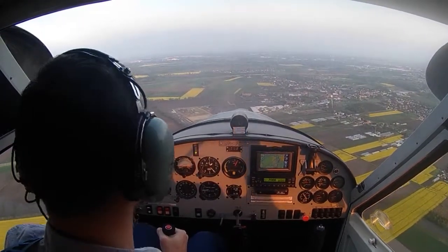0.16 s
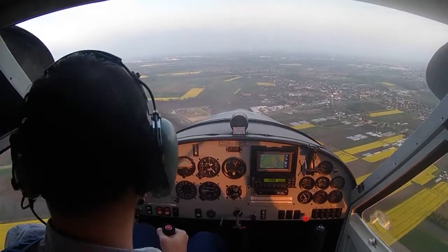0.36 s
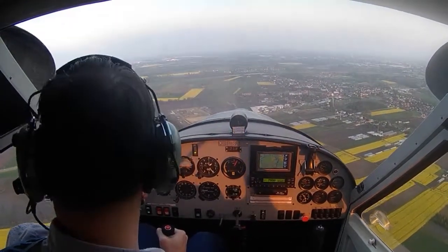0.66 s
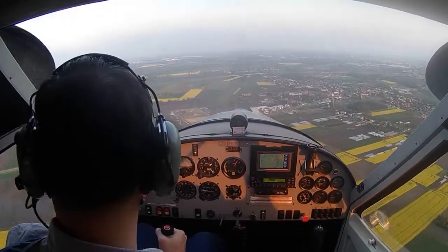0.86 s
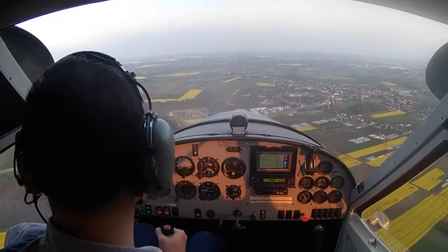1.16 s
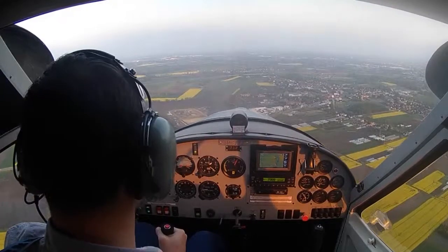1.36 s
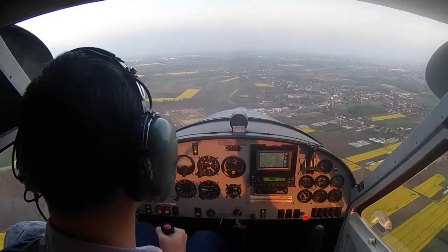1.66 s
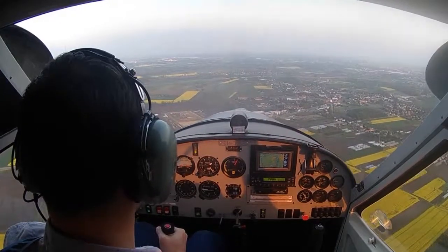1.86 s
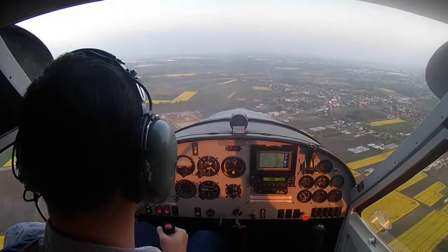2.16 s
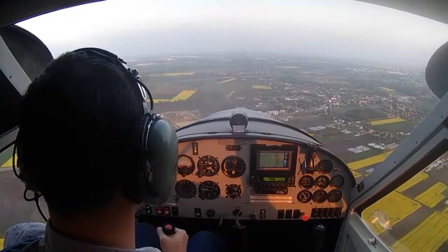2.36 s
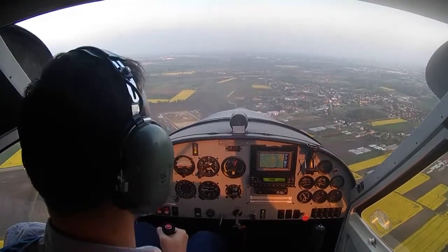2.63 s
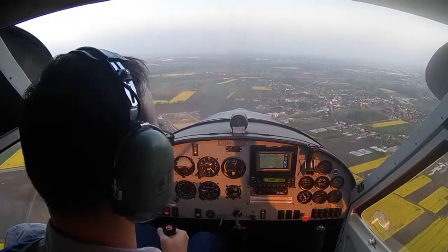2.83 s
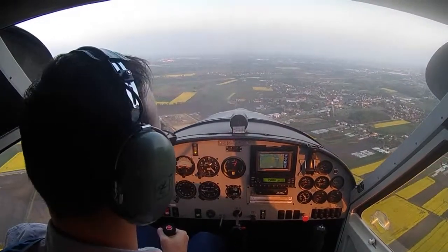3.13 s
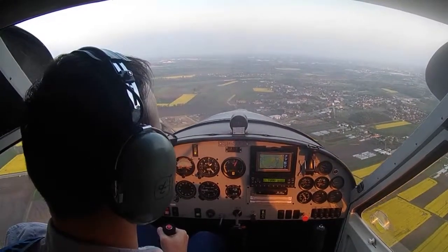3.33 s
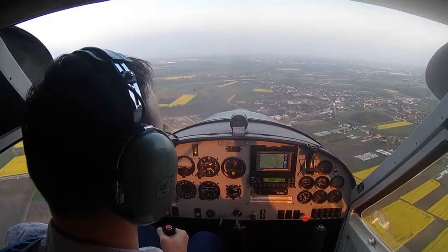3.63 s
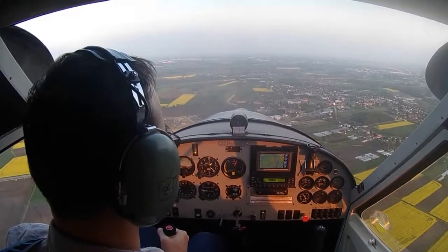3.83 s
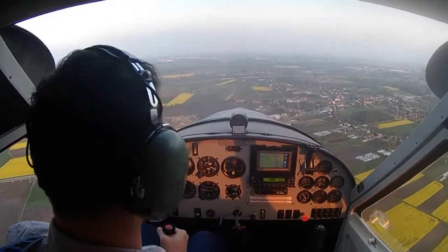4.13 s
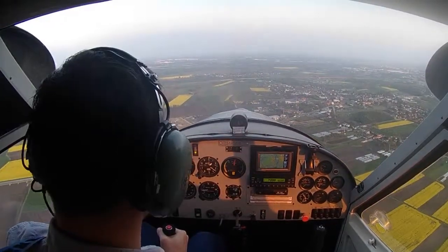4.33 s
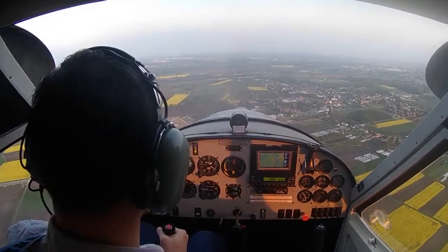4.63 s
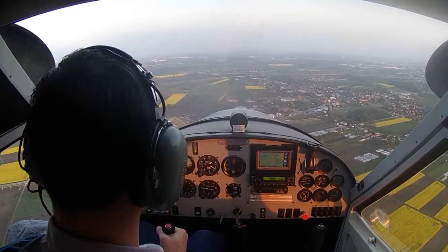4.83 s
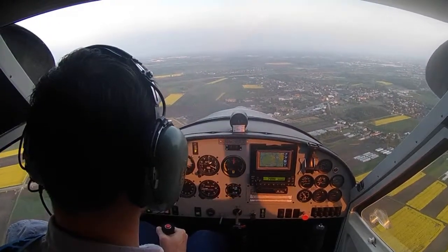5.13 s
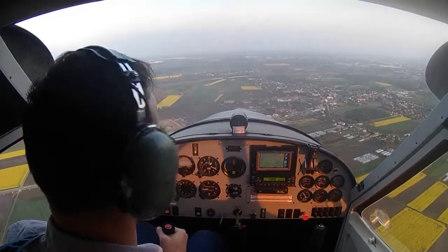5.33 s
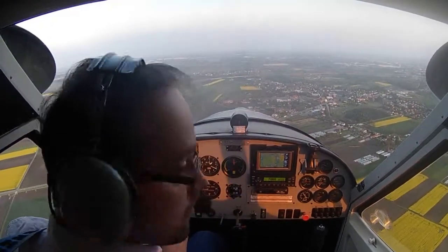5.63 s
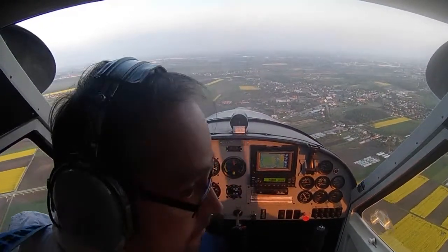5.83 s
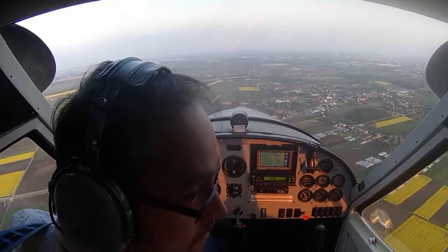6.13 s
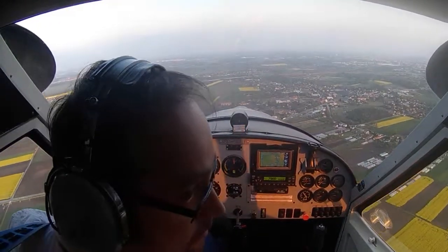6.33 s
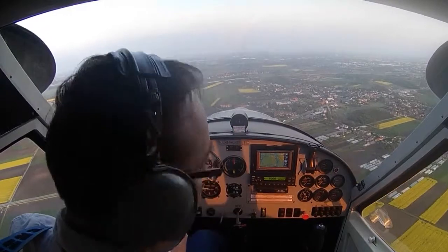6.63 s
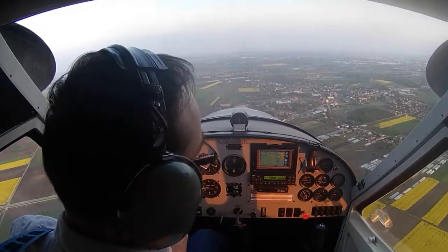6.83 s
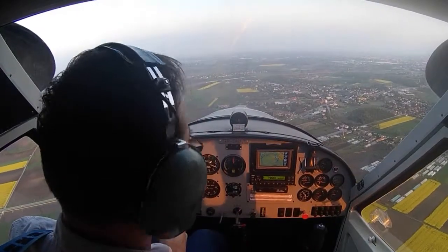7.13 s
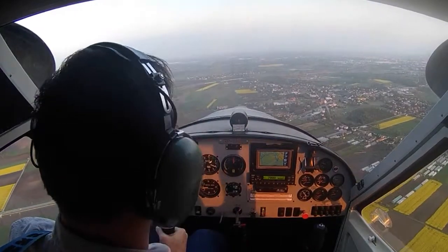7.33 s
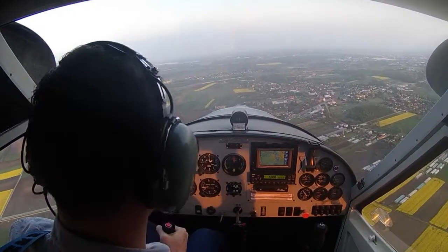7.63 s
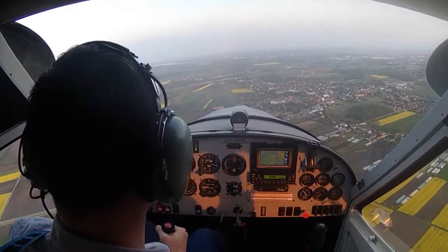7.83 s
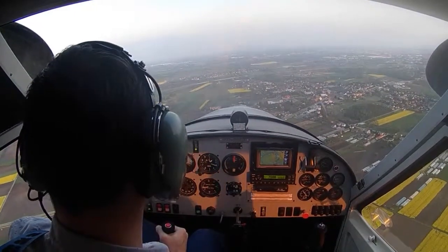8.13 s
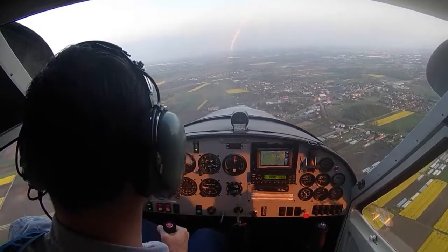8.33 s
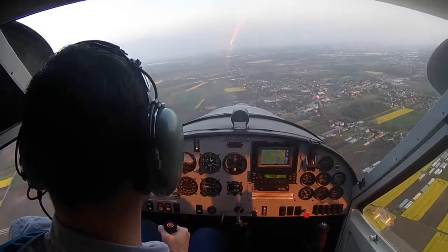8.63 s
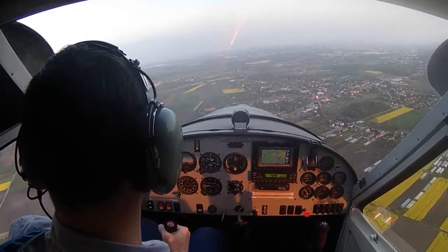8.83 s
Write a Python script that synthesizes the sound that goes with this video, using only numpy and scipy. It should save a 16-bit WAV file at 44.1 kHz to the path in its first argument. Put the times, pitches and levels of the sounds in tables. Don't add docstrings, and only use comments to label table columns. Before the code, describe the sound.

Heard inside a light aircraft cockpit in flight: a heavy, low propeller and piston engine drone with thudding buffets and constant air rush. Near four seconds the throttle is pulled back; the pitch slides down and the tones thin, leaving cabin boom and wind until the end. A small enclosed microphone muffles the treble, overloads on peaks and adds a very faint high whine.

```python
import sys
import numpy as np
from scipy import signal
from scipy.fft import rfft, irfft, next_fast_len
from scipy.io import wavfile
from scipy.ndimage import uniform_filter1d

SR = 44100
rng = np.random.default_rng(int(sys.argv[2]) if len(sys.argv) > 2 else 0)


def natural_amplitude(level_db):
    exponent = np.asarray(level_db, float) / 20
    return 10 ** exponent


def transcribe(u):
    v = np.clip(np.atleast_2d(u).T, -1, 1)
    q = np.round(v * 32767).astype(np.int16)
    wavfile.write(sys.argv[1], SR, q)


N = 396018


def rms_one(x):
    return x / np.sqrt(np.mean(x ** 2) + 1e-20)


def in_time(rows):
    seconds, *columns = np.transpose(rows)
    return [np.interp(np.arange(N) / SR, seconds, column) for column in columns]


def drift(rate):
    pole = np.exp(-80 * np.pi * rate / SR)
    noise = rng.standard_normal(N // 40 + 2002)
    slow = signal.lfilter([1], [1, -2 * pole, pole * pole], noise)[2000:]
    return np.interp(np.arange(N) / 40, np.arange(len(slow)), rms_one(slow))


def shaped(gain_at):
    size = next_fast_len(N)
    hz = np.arange(size // 2 + 1) * SR / size + 1e-3
    spectrum = rfft(rng.standard_normal(size)) * gain_at(hz)
    return rms_one(irfft(spectrum, size)[:N])


def resonant(modes, steep):
    def gain_at(hz):
        power = 0
        for centre, width, db in modes:
            detuning = (hz ** 2 - centre ** 2) / (hz * width)
            power = power + natural_amplitude(2 * db) / (1 + detuning ** 2) ** steep
        return np.sqrt(power)
    return shaped(gain_at)


def evened(x, size):
    return x / np.sqrt(uniform_filter1d(x ** 2, size=size) + 0.017)


def running(x, order, hz, kind="low"):
    run_in = 4096
    sos = signal.butter(order, hz, kind, fs=SR, output="sos")
    led_in = np.concatenate([x[..., run_in:0:-1], x], axis=-1)
    return signal.sosfilt(sos, led_in)[..., run_in:]


def tone(turns, level_db, wobble_db):
    return np.sqrt(2) * natural_amplitude(level_db + wobble_db * drift(1.0)) * np.sin(2 * np.pi * turns)


def whine():
    # time in seconds, shift in Hz.
    sag = [
        (0, 3),
        (7.05, -1),
        (7.07, -30),
        (7.97, -26.5),
        (7.99, -1),
        (8.98, 0),
    ]
    whine_hz, wander_hz, chop_hz, side_tone_hz = 15703.7, 2.5, 97.22, 11880
    t = np.arange(N) / SR
    turns = np.cumsum(whine_hz + in_time(sag)[0] + wander_hz * drift(1.5)) / SR
    chop = sum(2 * natural_amplitude(-11.5) / k ** 1.3 * np.cos(2 * np.pi * k * chop_hz * t) for k in range(1, 11))
    carrier = natural_amplitude(-53.5) * (1 + chop) * np.sin(2 * np.pi * turns)
    side_tone = natural_amplitude(-82) * np.sin(2 * np.pi * side_tone_hz * t)
    return np.sqrt(2) * (carrier + side_tone)


def top_air(swell_db):
    # frequency in Hz, level in dB per Hz.
    air_curve = [(5000, -12.5), (6300, -8.5), (7200, -7), (7700, -9.5), (8100, -3), (8600, -4), (9400, 0),
                 (10100, 1.5), (11200, -6.5), (11700, -2.5), (13300, -4), (13900, -7), (15000, -6),
                 (16000, -4.5)]
    hz, level_db = np.transpose(air_curve)
    air = shaped(lambda f: natural_amplitude(np.interp(np.log(f), np.log(hz), level_db, left=-60)))
    return natural_amplitude(-54.5 + 0.55 * swell_db) * air


def housing_hiss(swell_db):
    # centre in Hz, width in Hz, level in dB.
    housing_modes = [(2140, 80, -12.5), (2286, 76, -5), (2372, 225, -2.5), (2470, 92, 1.5), (2613, 29, 0),
                     (2670, 74, -5.5), (2997, 420, -5.5), (3290, 330, -10), (3556, 110, -7.5),
                     (3880, 200, -14), (4454, 66, -13), (4766, 220, -13), (5260, 230, -15.5),
                     (5790, 100, -21), (6350, 150, -39), (6870, 220, -24)]
    return natural_amplitude(-28.0 + 1.03 * swell_db + 0.18 * drift(6.3)) * resonant(housing_modes, steep=1.24)


def canopy_rush(rush_db):
    # centre in Hz, width in Hz, level in dB.
    canopy_modes = [(495, 98, -8.5), (543, 14, -9), (598, 20, -9), (637.4, 12.6, -5), (767, 112, -6),
                    (847, 35, -6.5), (947.4, 48, -1), (1053, 100, -5.5), (1144, 56, -2.5),
                    (1196.5, 18, 0.5), (1235, 11, 0.5), (1271, 63, -3.5), (1335, 22, -4), (1396, 55, -5.5),
                    (1507, 49, 0), (1680, 90, -11), (1797, 74, -14.5), (1906, 62, -12.5), (2040, 40, -19.5)]
    return natural_amplitude(rush_db + 0.69 + 0.71 * drift(3.3)) * resonant(canopy_modes, steep=1.274)


def cabin_boom(power, swell_db):
    # centre in Hz, width in Hz, level in dB.
    cabin_modes = [(26, 5, -9), (45.4, 6.8, -6), (55, 7.9, -3), (69.5, 8.4, -2.5), (82.9, 11.7, 2.5),
                   (99, 15, -29), (122.4, 18, -6), (141.6, 14.3, -4.5), (183, 18, -10.5), (194.5, 15, -7),
                   (215.5, 9.1, -1), (234.8, 13.2, -3), (268.4, 25, -10.5), (295.5, 12.6, -12.5),
                   (326.6, 16.5, -11.5), (348, 20, -14), (393.2, 19.4, -12), (408, 17.5, -15)]
    return natural_amplitude(-19 + 2.73 * power + 0.61 * swell_db) * resonant(cabin_modes, steep=1.42)


def airframe_heave():
    # centre in Hz, width in Hz, level in dB.
    heave_modes = [(33.2, 0.87, 6), (38.1, 1.4, -19)]
    # time in seconds, level in dB.
    turbulence = [(0.0, -18), (0.05, -20), (1.45, -22), (1.5, -29), (1.72, -21), (2.8, -16.5), (3.02, -25),
                  (3.07, -17), (3.83, -19.5), (4.03, -12.5), (4.87, -28), (5.28, -18), (6.05, -22),
                  (6.15, -35), (6.65, -13.5), (7.2, -26.5), (8.85, -22), (8.98, -35)]
    heave_db = in_time(turbulence)[0] + 1.9 * drift(4.0) - 0.3
    return natural_amplitude(heave_db) * evened(resonant(heave_modes, steep=1.35), size=6000)


def throbbing():
    # crest in seconds, swell in dB.
    throbs = [
        (.28, 6.5),
        (.62, 10.5),
        (1.07, 10),
        (1.41, 12),
        (1.75, 6.5),
        (2.66, 9.5),
        (3.0, 11.5),
        (3.38, 8.5),
        (3.66, 10.5),
        (3.86, 14.5),
    ]
    half_length_s = 0.084
    t = np.arange(0, N, 40) / SR
    swell_db = sum(db * np.exp(-0.5 * ((t - crest) / half_length_s) ** 2) for crest, db in throbs)
    return np.interp(np.arange(N) / SR, t, swell_db)


def drumming_panel(power):
    # centre in Hz, width in Hz, level in dB.
    panel_modes = [(152.8, 7.3, -11.5), (159.7, 3.8, -2)]
    idle_db, cruise_db, flutter_db = -26, -29.5, 2.5
    panel_db = idle_db + power * (cruise_db - idle_db) + throbbing() + flutter_db * drift(4.2)
    panel = natural_amplitude(panel_db) * evened(resonant(panel_modes, steep=1.7), size=5000)
    return running(panel, order=2, hz=[144, 163], kind="band")


def airflow(power):
    # time in seconds, level in dB.
    rush_curve = [(0.0, -17.5), (0.6, -17), (4.05, -17.5), (4.22, -18.5), (8.95, -20), (8.98, -21)]
    rush_db, = in_time(rush_curve)
    swell_db = rush_db - np.mean(rush_db)
    body = airframe_heave() + drumming_panel(power) + cabin_boom(power, swell_db) + canopy_rush(rush_db)
    body = running(body, order=2, hz=2600)
    body = running(body + housing_hiss(swell_db), order=4, hz=5460)
    return body + top_air(swell_db)


def engine(turns, power):
    # multiple of half a crank turn, level at cruise in dB, level throttled in dB.
    engine_tones = [(2, -34, -29), (3, -30, -45), (4, -35, -38), (6, -33, -38), (8, -23.5, -39),
                    (10, -40, -48), (11, -41, -50)]
    crank_per_blade = 58.9 / 77.78
    start_turns = 0.12
    exhaust = power ** 1.8
    half_turns = (turns * crank_per_blade + start_turns) / 2
    return sum(tone(k * half_turns, idle_db + exhaust * (cruise_db - idle_db), wobble_db=0.5)
               for k, cruise_db, idle_db in engine_tones)


def propeller(turns, power):
    # multiple of the blade rate, level at cruise in dB, level throttled in dB.
    blade_tones = [(1, -15, -29), (2, -23, -32), (3, -26, -44), (4, -39, -42), (5, -47, -52)]
    # time in seconds, level in dB.
    disc_load = [
        (0, 1.5),
        (.8, 0),
        (1.3, -1.5),
        (2.4, 2.5),
        (3.2, 1),
        (3.6, 2),
        (3.9, -5),
        (4.3, -2),
        (8.98, 0.5),
    ]
    load_share = [1.4, 0.59, -0.05, -0.25, 0]
    load_db = in_time(disc_load)[0]
    swells = [share * load_db for share in load_share]
    swells[1] = swells[1] + 0.85 * throbbing() - 2.1
    swells[2] = swells[2] + 2.5 * power
    pressure = 0
    for (k, cruise_db, idle_db), swell_db in zip(blade_tones, swells):
        level_db = idle_db + power * (cruise_db - idle_db) + swell_db
        pressure = pressure + tone(k * turns, level_db, wobble_db=1.25)
    return -pressure


def scene():
    # time in seconds, blade passes in Hz.
    speed = [(0, 77.78), (3.0, 77.72), (3.4, 77.2), (3.7, 76.6), (3.95, 74), (4.2, 69.5), (4.5, 65),
             (4.8, 63), (5.3, 63.6), (6, 63.8), (7.3, 63.8), (8.98, 63.4)]
    # time in seconds, share of cruise power from 0 to 1.
    throttle = [
        (0, 1),
        (3.55, 0.82),
        (3.9, 0.68),
        (4.3, 0.16),
        (8.98, 0.1),
    ]
    turns = np.cumsum(in_time(speed)[0]) / SR
    power = np.clip(in_time(throttle)[0], 0, 1)
    return (airflow(power) + engine(turns, power) + propeller(turns, power))[None]


def band_limit(x):
    return signal.sosfilt(signal.butter(12, 15730, fs=SR, output="sos"), x)


def record(dry):
    overload = 0.955
    mix = running(dry, order=2, hz=14.5, kind="high") + whine()
    return band_limit(np.clip(mix, -overload, overload))


dry = scene()
out = record(dry)
transcribe(out)
```